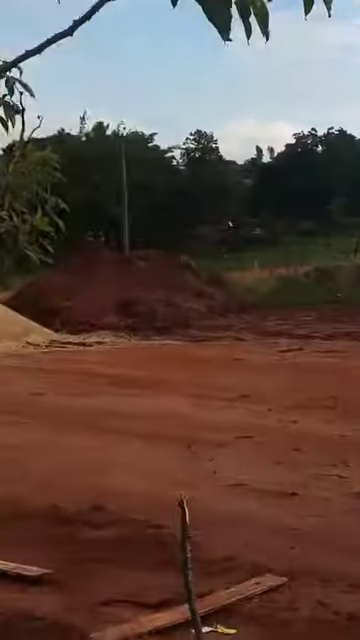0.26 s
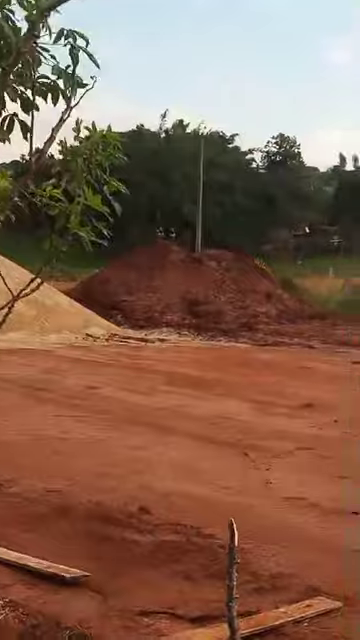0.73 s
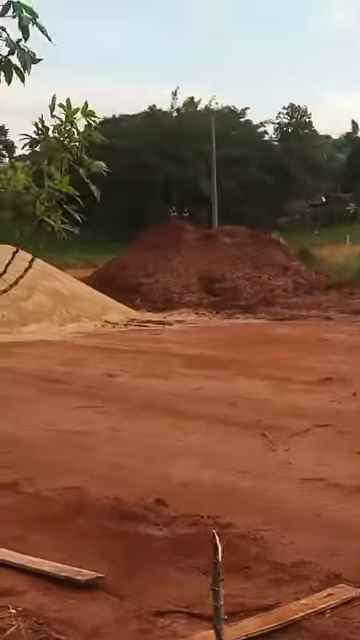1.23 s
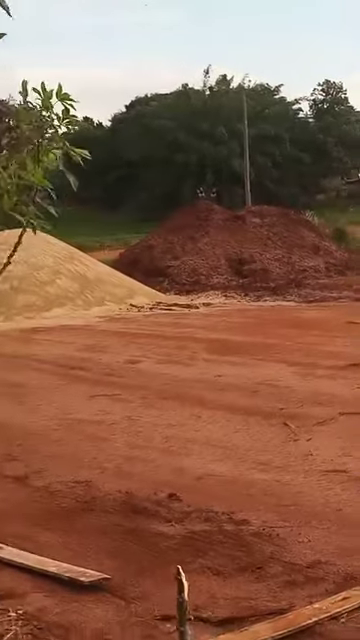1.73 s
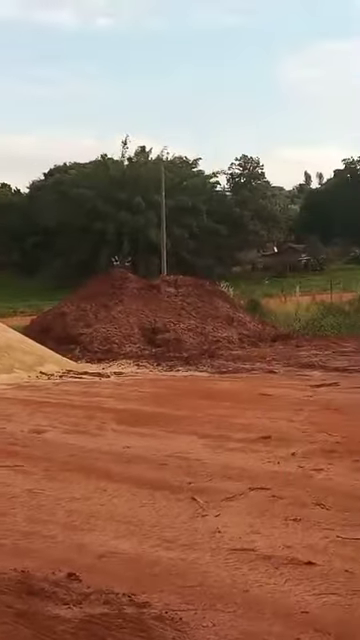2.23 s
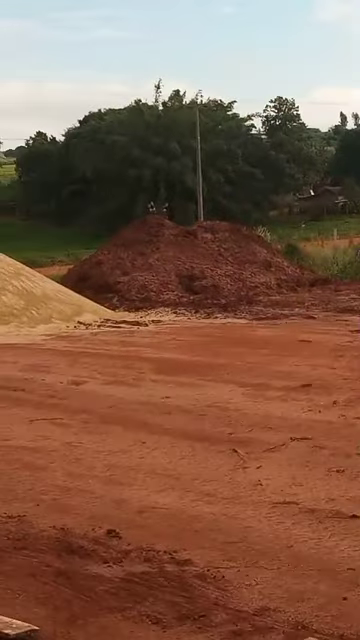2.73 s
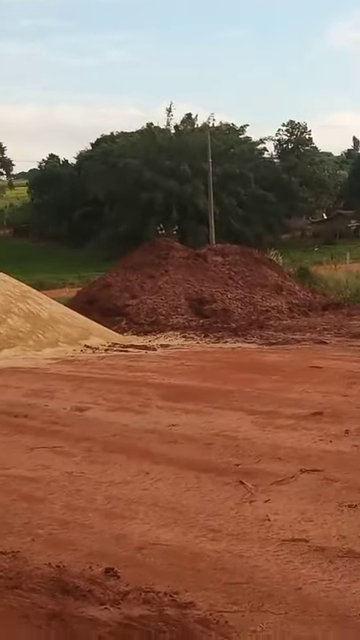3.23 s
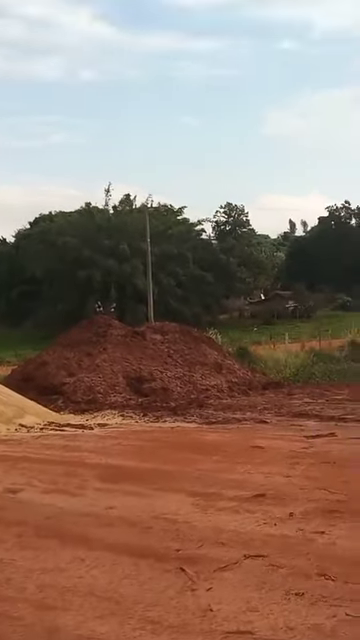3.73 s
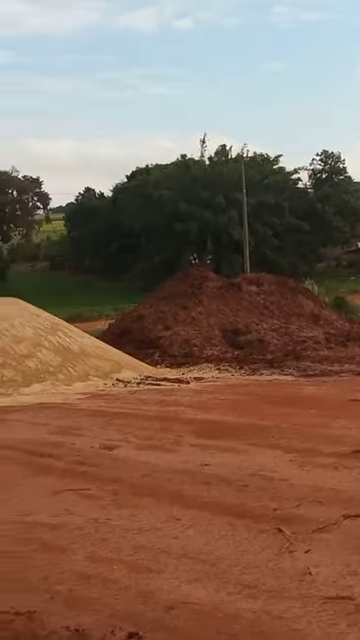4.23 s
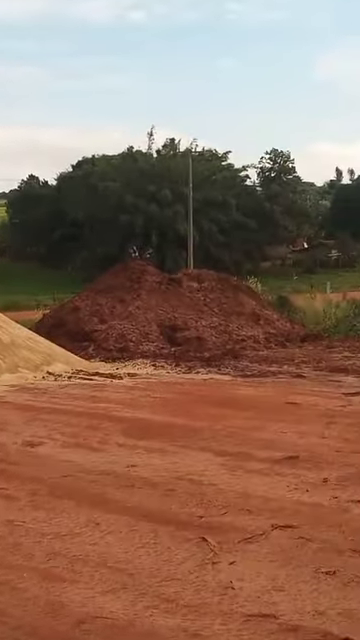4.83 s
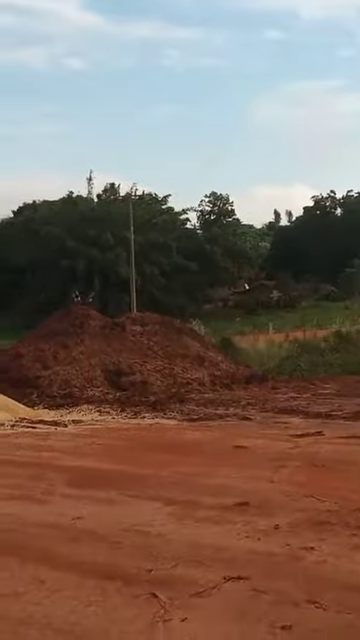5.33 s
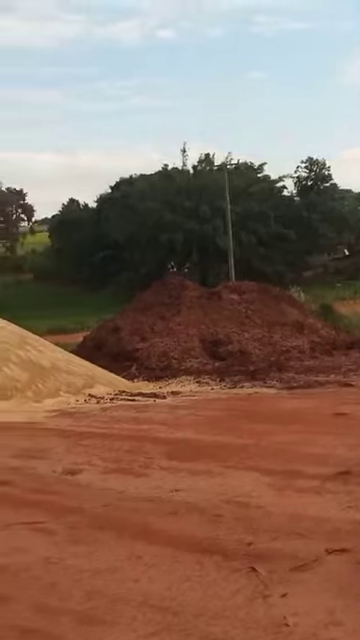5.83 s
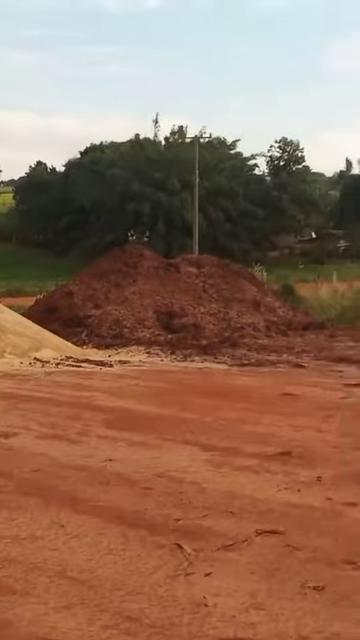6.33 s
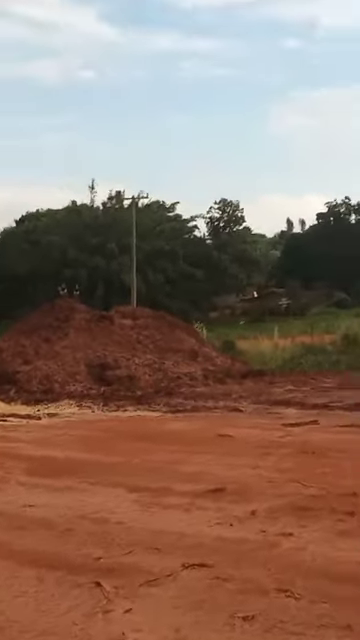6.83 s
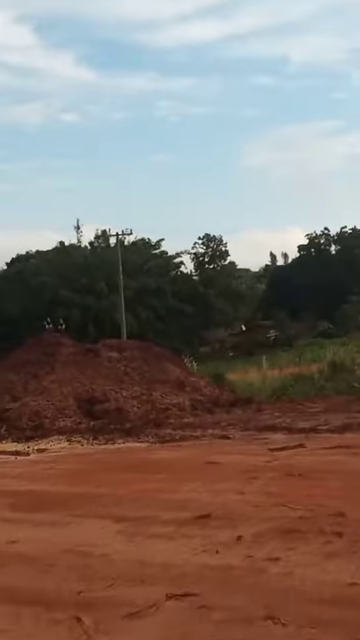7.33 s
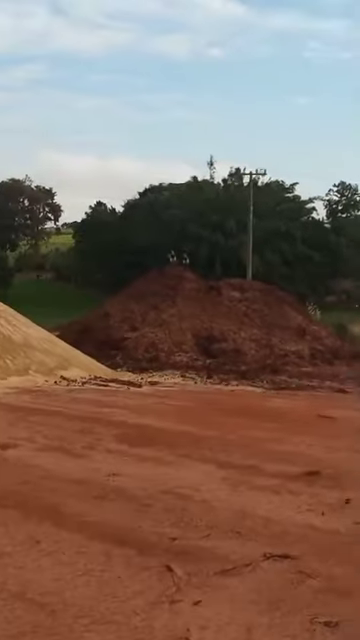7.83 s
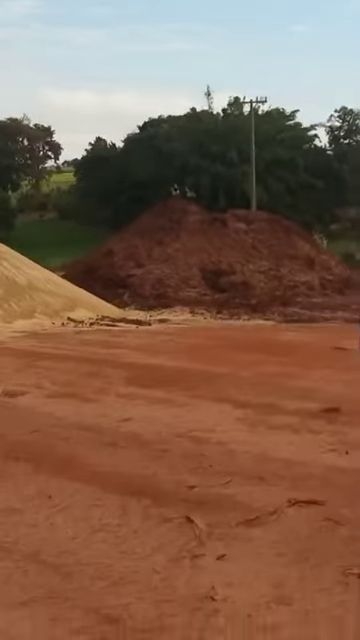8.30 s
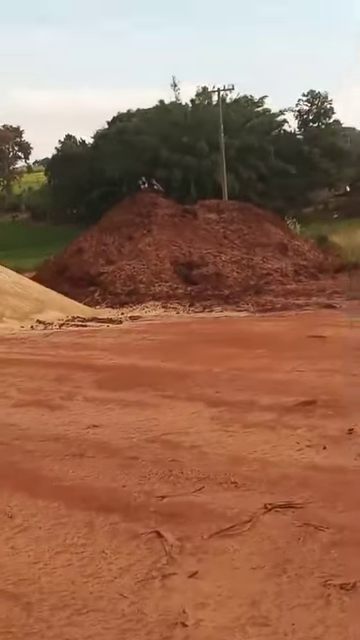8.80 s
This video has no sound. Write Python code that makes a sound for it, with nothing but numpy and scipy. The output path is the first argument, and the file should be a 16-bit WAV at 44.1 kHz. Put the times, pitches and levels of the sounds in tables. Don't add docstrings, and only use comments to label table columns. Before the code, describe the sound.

Harsh and mellower bird calls alternate about every half second, each a brief buzzy start sliding down, growing denser after six seconds. Clucks and small chirps fill gaps. Early light fingertip ticks and a fizzy rustle, later sharp rubs and a dull knock on the phone case. Soft low wind buffets strengthen toward the end; faint air hiss and a faraway engine lie beneath the open field.

```python
import sys
import numpy as np
from scipy import signal
from scipy.fft import rfft, irfft, next_fast_len
from scipy.io import wavfile
from scipy.ndimage import uniform_filter1d, map_coordinates

SR = 44100
rng = np.random.default_rng(int(sys.argv[2]) if len(sys.argv) > 2 else 0)


def generate_wav(sig):
    pcm = np.round(np.clip(np.atleast_2d(sig).T, -1, 1) * 32767).astype(np.int16)
    wavfile.write(sys.argv[1], SR, pcm)


def level_to_linear(level):
    exponent = np.asarray(level, float) / 20
    return 10 ** exponent


N = 399546

# [from t/s, to t/s, share of rasp/1]
HOARSE = [(.63, .74, .25), (2.68, 2.75, .35), (5.84, 5.86, .12), (6.55, 6.635, .6), (6.206, 6.24, .25),
          (5.683, 5.72, .25), (6.62, 6.72, .5), (7.15, 7.24, .45), (7.92, 8.003, .45), (8.54, 8.635, .7),
          (4.53, 4.655, .55), (2.99, 3.13, .3), (7.225, 7.43, .42), (7.8, 7.851, .4), (7.853, 7.93, .3),
          (8.29, 8.41, .5), (8.81, 8.9, .3)]
CROAKS_AFTER_S = .06


def unit(x):
    return x / np.sqrt(np.mean(x ** 2) + 1e-20)


def along(points, hz):
    f, v = np.transpose(points)
    return np.interp(np.log(hz + 1), np.log(f + 1), v)


def wobble(rate, size=N):
    knots = rng.standard_normal(int(size / SR * rate) + 4)
    return map_coordinates(knots, [np.arange(size) * rate / SR])


def rush(spectrum):
    m = next_fast_len(N)
    colour = level_to_linear(along(spectrum, np.fft.rfftfreq(m, 1 / SR)))
    return unit(irfft(rfft(rng.standard_normal(m)) * colour, m)[:N])


def place(out, s, sound):
    out[round(s * SR):][:len(sound)] += sound


def pings(events, cycles, noisy):
    out, t = np.zeros(N + SR), np.arange(SR // 10) / SR
    for s, db, hz in events:
        wave = np.sin(2 * np.pi * hz * t) + noisy * np.diff(rng.standard_normal(len(t) + 1))
        decay = np.exp(-t * hz / cycles) * (1 - np.exp(-t * hz / 0.5))
        place(out, s, level_to_linear(db + 9.5) * wave * decay)
    return out[:N]


def birds():
    # [t/s, length/s, top f/Hz, end f/Hz, level/dB]
    mellow_notes = [(.016, .144, 1189, 1022, -32.5), (.993, .117, 1135, 1010, -36),
                    (1.13, .13, 1204, 1025, -44), (1.497, .045, 1160, 1112, -34),
                    (1.535, .048, 1316, 1256, -36), (1.605, .145, 1140, 970, -42),
                    (2.14, .15, 1142, 998, -31), (3.248, .142, 1147, 950, -32),
                    (3.727, .148, 1206, 985, -30.5), (4.178, .132, 1189, 954, -28),
                    (4.23, .16, 1216, 994, -26), (4.775, .145, 1190, 1016, -28),
                    (5.755, .145, 1154, 984, -28), (6.29, .16, 1181, 1000, -28.5),
                    (6.775, .155, 1217, 1038, -30), (6.92, .07, 1030, 925, -34),
                    (8.735, .165, 1201, 935, -25.5)]
    # [rasp at the start/s, fade halfway/dB, beak/dB]
    mellow_voices = [(0, -13, -9), (.014, -6, -10), (0, .6, .6), (.015, -8, -9), (0, -2.5, 3),
                     (0, -3, -5.5), (.025, -7, -6.5), (.025, -8, -8.5), (0, -1.5, -3), (0, -12, -9.5),
                     (0, -6, -8), (0, -3, -2.5), (0, -8, .3), (0, -7, -5.5), (0, 4, -1.5), (0, -3, 1.5),
                     (0, -7, -8)]
    # [t/s, length/s, top f/Hz, end f/Hz, level/dB]
    harsh_notes = [(.65, .09, 1310, 1110, -31), (1.585, .025, 1256, 1214, -26),
                   (1.802, .098, 1232, 996, -42), (2.2, .085, 1287, 1199, -26),
                   (2.675, .125, 1200, 993, -31), (3.333, .075, 1283, 1172, -26),
                   (4.02, .09, 1264, 1184, -25), (4.652, .038, 1314, 1218, -27),
                   (4.7, .078, 1283, 1140, -26.5), (5.17, .09, 1278, 1129, -25),
                   (5.682, .09, 1292, 1150, -25), (5.85, .1, 1280, 1172, -27),
                   (6.205, .09, 1283, 1140, -26), (6.6, .03, 1157, 1160, -28),
                   (6.688, .082, 1259, 1104, -27), (7.22, .012, 1100, 1120, -29),
                   (7.24, .18, 1295, 1030, -26.5), (7.745, .105, 1258, 1120, -25.5),
                   (7.852, .07, 1280, 1140, -27), (8.0, .075, 1274, 1140, -33),
                   (8.232, .098, 1243, 1123, -26), (8.37, .08, 1249, 1012, -26),
                   (8.63, .08, 1265, 1200, -30), (8.87, .05, 1285, 1128, -26.5)]
    # [length/s, start f/Hz, start level/dB, beak/dB, share of the fall done halfway/1]
    run_ups = [(.025, 1204, -45, 2.5, .3), (.004, 1256, -28, 3, .5), (.05, 1247, -50, -2, .3),
               (.077, 1274, -43, 3, .14), (.06, 1165, -35.5, -2.5, .38), (.022, 1284, -38, 4, .24),
               (.084, 1248, -38, -1, .19), (.125, 1281, -30, 3, .5), (.08, 1199, -35, -6, .62),
               (.065, 1100, -41, 1.5, .37), (.067, 1182, -36, 2, .62), (.024, 1160, -29, .3, .5),
               (.074, 1150, -41, .6, .61), (.043, 1156, -34, 3, .5), (.058, 1293, -30, 1.5, .64),
               (.068, 1060, -27, -1, .5), (.014, 1270, -34, -.6, .42), (.04, 1200, -32, -7, .55),
               (.055, 1215, -34, -1.5, .5), (.08, 1175, -27, 3, .12), (.033, 1200, -33, -2.5, .5),
               (.07, 1200, -35, 2, .55), (.088, 1234, -32.5, 3, .28), (.07, 1209, -31, -4, .4)]
    # [at the top/dB, halfway/dB, at the end/dB]
    swells = [(-2.5, 0.0, -15.0), (-2.5, -1.0, -8.0), (6.0, -2.0, -6.5), (-1.0, 2.0, -12.0),
              (-4.5, 0.0, -9.0), (-1.5, -1.5, -4.0), (-3.5, 0.5, -10.5), (-3.5, 0.5, -3.5),
              (0.0, 1.0, -2.0), (-1.0, -2.5, -11.0), (-2.5, -0.5, -2.0), (-1.0, 1.0, -3.0),
              (0.0, -2.5, -6.0), (-4.5, -1.5, -7.5), (1.5, -4.0, -7.0), (-7.5, -8.0, -13.5),
              (-2.5, -3.5, -6.0), (0.0, -1.5, -4.5), (-1.5, 1.0, -4.0), (-4.0, -3.0, -14.0),
              (0.0, -0.5, -2.5), (0.5, -2.5, -8.0), (-4.0, -4.5, -4.0), (-2.5, 0.5, -7.0)]
    # [t/s, length/s, top f/Hz, level/dB, beak/dB]
    chirps = [(2.375, .045, 876, -47, -24), (2.99, .05, 1040, -36, -3), (3.062, .06, 965, -43, -8),
              (3.315, .055, 1070, -35, 0), (3.572, .065, 830, -43, -5.5), (5.505, .055, 767, -46, -28),
              (7.235, .115, 1160, -34, 0), (7.83, .1, 1210, -34, 1.5), (7.66, .06, 984, -41.5, -6.5),
              (8.04, .03, 927, -36, -6), (8.07, .045, 958, -38, -6), (8.62, .05, 1095, -31, 1.5),
              (8.9, .06, 1137, -30, 4)]
    # [overtone 2/dB, 3/dB, 4/dB, 5/dB, 8 and up/dB]
    mellow_tints = [(3.0, 2.0, 3.0, 1.0, 8.0), (0.0, -1.0, 2.0, 9.0, 1.0), (-2.0, -3.0, -3.0, 0.0, 10.0),
                    (-7.0, 0.0, -1.0, 6.0, 10.0), (-5.0, 0.0, 3.0, -6.0, 10.0),
                    (1.0, 6.0, 4.0, 0.0, 10.0), (2.0, 1.0, 3.0, 1.0, -4.0), (-2.0, -3.0, -1.0, 3.0, -2.0),
                    (4.0, 2.0, 2.0, -5.0, -5.0), (2.0, 1.0, 6.0, -1.0, -4.0),
                    (0.0, 1.0, 3.0, -10.0, -8.0), (-2.0, -2.0, 3.0, -2.0, 3.0),
                    (-4.0, 2.0, 6.0, -3.0, -3.0), (-2.0, 5.0, 0.0, 0.0, -3.0),
                    (-1.0, -2.0, 4.0, 1.0, 0.0), (3.0, -7.0, 5.0, -8.0, -4.0),
                    (-1.0, 4.0, 4.0, 5.0, -5.0)]
    harsh_tints = [(-1.0, 1.0, 1.0, -5.0, 5.0), (2.0, -2.0, 0.0, 9.0, -1.0), (0.0, -7.0, 6.0, -1.0, -4.0),
                   (-4.0, -10.0, 4.0, -1.0, 8.0), (0.0, 3.0, -2.0, 0.0, -10.0),
                   (3.0, -4.0, 2.0, -4.0, 1.0), (-1.0, -6.0, 5.0, 0.0, 3.0),
                   (-1.0, -5.0, 3.0, -8.0, -4.0), (0.0, 0.0, 3.0, -2.0, -10.0),
                   (4.0, -2.0, 4.0, -4.0, 1.0), (1.0, -1.0, -1.0, -3.0, -1.0),
                   (2.0, -5.0, -1.0, 0.0, -4.0), (4.0, -3.0, 1.0, -5.0, 7.0),
                   (-6.0, 1.0, -2.0, 4.0, -2.0), (1.0, 0.0, 2.0, 2.0, 2.0), (0.0, 3.0, -4.0, -6.0, -2.0),
                   (-1.0, 3.0, 1.0, 4.0, 1.0), (1.0, -1.0, -1.0, 5.0, 3.0), (3.0, 3.0, -5.0, -4.0, -3.0),
                   (-3.0, 4.0, 1.0, -2.0, 8.0), (3.0, -5.0, -2.0, 5.0, -2.0),
                   (3.0, -1.0, -2.0, 4.0, -5.0), (-4.0, 5.0, -4.0, 4.0, 2.0),
                   (0.0, -4.0, 4.0, -2.0, -10.0)]
    chirp_tint = (2, 2, -5, -7, -9)

    songs = [mellow(*pair) for pair in zip(mellow_notes, mellow_voices)]
    songs += [harsh(*parts) for parts in zip(harsh_notes, run_ups, swells)]
    songs += [chirp(*row) for row in chirps]
    tints = [*mellow_tints, *harsh_tints] + [chirp_tint] * len(chirps)
    out = np.zeros(N + SR)
    for n, ((rows, *voice), tint) in enumerate(zip(songs, tints)):
        place(out, rows[0][0], call(rows, *voice, tint, soft=n < len(mellow_notes)))
    return out[:N] + clucks() + pips()


def harsh(note, run_up, swell):
    s, length, top, end, db = note
    lead, from_hz, from_db, beak_db, bend = run_up
    rows = [(s - lead, from_hz, from_db),
            (s, top, db + swell[0]),
            (s + length / 2, top - bend * (top - end), db + swell[1]),
            (s + length, end, db + swell[2])]
    strained = any(start < s < stop for start, stop, _ in HOARSE)
    croak_db = -19 - 60 * (lead + length < CROAKS_AFTER_S)
    return rows, s - strained * (lead - .012), beak_db, croak_db


def mellow(note, voice):
    s, length, top, end, db = note
    rasp, half_db, beak_db = voice
    fade_db_per_s = 130
    peak = s + min(.03, length / 4)
    half = (peak + s + length) / 2
    rows = [(s, .925 * top, db - 5),
            (peak, top, db),
            (half, top - .5 * (top - end), db + half_db),
            (s + length, end, db + half_db - fade_db_per_s * (half - peak))]
    return rows, s + rasp, beak_db, -23 - 60 * (length < CROAKS_AFTER_S)


def chirp(s, length, top, db, beak_db):
    rows = [(s, .88 * top, db - 5), (s + .43 * length, top, db), (s + length, .83 * top, db - 6)]
    return rows, s, beak_db, -27


def call(rows, rasp_end, bright_db, croak_db, tint, soft):
    # [from t/s, to t/s]
    catches = [(2.623, 2.633), (5.113, 5.124), (5.625, 5.637), (5.645, 5.675), (7.16, 7.167),
               (7.713, 7.722)]
    s, hz, db = np.transpose(rows)
    age = np.arange(int((s[-1] - s[0] + .09) * SR)) / SR
    t = s[0] + age
    after = t - s[-1]

    rasp = np.clip((rasp_end - t) / .006, .03, 1)
    for start, end, share in HOARSE:
        inside = np.minimum(t - start, end - t)
        rasp = np.maximum(rasp, share * np.clip(inside / .008 + .5, 0, 1))

    slap_hz = 100 * level_to_linear(5 * np.clip(wobble(70, size=len(t)), -2, 2))
    beat = 2 * np.pi * np.cumsum(slap_hz) / SR
    jitter = wobble(500, size=len(t))
    jitter = jitter - uniform_filter1d(jitter, size=500)
    swing = .013 * np.sin(beat + 2.2) + .034 * jitter
    glide = uniform_filter1d(np.interp(t, s, hz), size=700, mode="nearest")
    pitch = glide * (1 + rasp * swing + 0.0018 * wobble(60, size=len(t)))

    level = level_to_linear(np.interp(t, s, db)) * (1 + .55 * np.sqrt(rasp) * np.sin(beat + 1))
    level = level * level_to_linear(1.3 * rasp * wobble(250, size=len(t)))
    for start, end in catches:
        level = level * np.clip(np.maximum(start - t, t - end) / .002 + 1, .08, 1)
    level = level * np.clip(age / .005, 0, 1) * np.clip(-after / .006 + .5, 0, 1)

    halves = .55 * (rasp - .03) * np.clip(wobble(60, size=len(t)) + .3, 0, 1)
    beak_db = bright_db - rasp * (5 + 10 * np.exp(-age / .03)) - soft * 9 * np.exp(-age / .03)
    wane_db = -soft * np.clip(190 * (age - .06), 0, 9)
    voice = syrinx(pitch, beak_db, turning_db=5, halves=halves, tint=tint, wane_db=wane_db)

    tail = after[after > 0]
    drop = level_to_linear(db.max() + croak_db) * croak(tail, 830, 0.068)
    return level * voice + np.pad(drop, (len(t) - len(tail), 0))


def syrinx(pitch, bright_db, turning_db, halves=0, tint=(0, 0, 0, 0, 0), wane_db=0):
    # [f/Hz, level/dB]
    throat = [(700, -38), (1200, -26), (1600, -13), (2350, -3), (2900, 0), (3500, -7), (4900, -3.5),
              (5600, -14.5), (6300, -6.5), (7300, -25), (8200, -45), (9800, -26), (12300, -52),
              (15000, -39)]
    k = np.r_[1:18, 2.5:7][:, None]

    def slow(x):
        return np.broadcast_to(x, pitch.shape)[::8]

    hz, bright_db = k * slow(pitch), slow(bright_db)
    treble = np.clip((9500 - hz) / 2000, .25 + .75 * (bright_db < -22), 1)
    upper = np.clip((k - 2) * .75, 0, 1) * treble
    turn = np.array([wobble(35 * 8, size=hz.shape[1]) for _ in k]) * np.clip((k - 1.5) / 2, .25, 1)
    gain = level_to_linear(along(throat, hz) + bright_db * upper + turning_db * turn)
    gain = gain * np.where(k % 1 > 0, slow(halves), 1)
    gain = gain / np.sqrt(np.sum(gain ** 2, axis=0) / 2)
    gain = np.repeat(gain, 8, axis=1)[:, :len(pitch)]
    tint_db = np.interp(k, [1, 2, 3, 4, 5, 6, 8], [0, *tint[:4], 0, tint[4]])
    gain = gain * level_to_linear(.85 * tint_db)
    gain = gain * np.where(k == 2, level_to_linear(wane_db), 1)
    phase = 2 * np.pi * np.cumsum(pitch) / SR
    return np.sum(gain * np.sin(k * phase + k * k * 0.6), axis=0)


def croak(t, hz, length):
    early = np.clip(t, 0, .08)
    sag = hz * (1 - 70 * early ** 2 - early) * (1 + 0.014 * wobble(197.5, size=len(t)))
    envelope = np.clip(t / .008, 0, 1) * np.clip((length - t) / .02, 0, 1)
    return envelope * syrinx(sag, -6 - 150 * t, turning_db=5)


def clucks():
    # [t/s, peak level/dB, second overtone f/Hz]
    cluck_notes = [(0.638, -36.5, 1725), (1.125, -54, 1820), (1.6, -50, 1740), (1.6427, -43.5, 1600),
                   (1.7744, -43.5, 1517), (2.1565, -53, 1770), (2.6898, -41.5, 1827), (.99, -42, 2850),
                   (2.703, -29, 2390), (4.232, -29, 2460), (7.722, -28, 2500), (3.3119, -39, 1960),
                   (5.743, -45, 1990), (6.9192, -36, 1980), (7.2479, -47, 2040), (7.7775, -37.5, 1925),
                   (8.283, -40, 2095)]
    out, t = np.zeros(N + SR), np.arange(SR // 16) / SR
    for s, db, hz in cluck_notes:
        place(out, s, level_to_linear(db) * croak(t, hz / 2, 0.032))
    return out[:N]


def pips():
    # [t/s, peak level/dB, f/Hz]
    pulses = [(1.496, -30, 2450), (1.645, -33, 2280), (1.654, -33, 3350), (2.126, -36, 2250),
              (2.704, -23, 2390), (3.262, -28, 2500), (4.233, -25, 2420), (6.134, -34, 2150),
              (6.147, -29, 3200), (6.166, -27, 3350), (6.765, -27, 2300), (7.149, -27, 2080),
              (8.367, -24, 2500), (8.688, -24, 3650), (8.696, -24, 3600)]
    out, t = np.zeros(N + SR), np.arange(SR // 16) / SR
    hump = np.sin(np.pi * np.clip(t / .009, 0, 1)) ** 2
    for s, db, hz in pulses:
        place(out, s, level_to_linear(db) * hump * np.sin(2 * np.pi * hz * t))
    return out[:N]


def field(x, delay, near_db):
    # [f/Hz, decay by 60 dB/s]
    tree_line = [(1000, 0.3), (2400, 0.25), (4500, 0.34), (7000, 0.36), (12000, 0.25)]
    hz, t, z = signal.stft(rng.standard_normal(SR), SR, nperseg=256)
    rise = np.where(t < delay, level_to_linear(near_db), 1)
    trees = level_to_linear(-60 * t / along(tree_line, hz)[:, None])
    slopes = level_to_linear(-25 - 60 * t / 1.0)
    tail = signal.istft(z * rise * (trees + slopes), SR, nperseg=256)[1]
    return signal.fftconvolve(x, tail / np.linalg.norm(tail))[:N]


def wind():
    # [f/Hz, level/dB per Hz]
    buffet = [(25, -50), (45, -17), (65, -3), (110, 0.5), (145, -5.5), (200, -17.5), (320, -31.5),
              (500, -52.5)]
    # [peak t/s, peak level/dB, time to rise 20 dB/s, time to sink 20 dB/s]
    gusts = [(.07, -60, .15, .12), (.39, -57.5, .09, .6), (.72, -55.5, .13, .18), (2.18, -61, .2, .15),
             (2.54, -71, .6, .33), (2.84, -59, .1, .2), (3.13, -62, .13, .1), (3.49, -52.5, .2, .6),
             (3.3, -60, .08, .08), (3.89, -47.5, .6, .67), (4.47, -44, .23, .07), (4.61, -54, .14, .17),
             (5.48, -69, .3, .15), (6.09, -55, .25, .13), (6.67, -51, .11, .39), (7.42, -49, .145, .11),
             (7.99, -40, .38, .3), (8.13, -44.5, .3, .17), (8.47, -51.5, .05, .065), (8.76, -42, .08, .5)]
    # [t/s, peak level/dB, f/Hz]
    thumps = [
        (3.879, -36, 119),
        (4.456, -40.5, 138),
        (7.96, -40, 135),
        (8.119, -39, 96.9),
        (8.443, -44.5, 93),
        (8.748, -41, 116),
        (8.928, -56, 72.7),
    ]
    lumps = unit(level_to_linear(4.5 * wobble(18)) * rush(buffet))
    t, strength_db = np.arange(N) / SR, np.full(N, -79.0)
    for s, db, rise, sink in gusts:
        gust_db = db - 20 * np.maximum((s - t) / rise, (t - s) / sink)
        strength_db = np.maximum(strength_db, gust_db)
    return level_to_linear(strength_db - 2) * lumps + pings(thumps, cycles=0.97, noisy=0)


def hand():
    # [t/s, length/s, fizz level/dB, scuff level/dB]
    rustle = [
        (0.486, 0.3, -51, -61),
        (1.954, 0.19, -54, -75),
        (2.039, 0.069, -68, -61.5),
        (6.35, 0.25, -84, -66),
        (6.623, 0.062, -45, -47.5),
        (6.758, 0.13, -49, -52),
        (6.955, 0.2, -85.5, -70),
        (7.18, 0.065, -85, -65),
        (7.29, 0.054, -80, -59),
        (7.367, 0.044, -45, -47),
    ]
    # [f/Hz, level/dB per Hz]
    fizz_colour = [(530, -52), (900, -27), (1830, -12), (2460, -17), (3890, -17), (5310, -18), (6430, -3),
                   (7790, -21), (15800, -33)]
    scuff_colour = [(120, -16), (250, -9.5), (600, -4), (1000, -18), (2000, -25)]
    # [t/s, peak level/dB, f/Hz]
    ticks = [(0.5616, -38, 6360), (0.5916, -54, 7060), (0.5916, -45, 6500), (0.613, -42, 6300),
             (0.658, -42, 6440), (0.6968, -36, 6460), (0.7856, -41, 6500), (0.9338, -58, 6600),
             (1.0554, -56, 6180), (2.0278, -31, 6700), (2.0434, -30, 6140), (2.0604, -39, 6050),
             (5.5264, -44, 6360)]
    # [t/s, peak level/dB, f/Hz]
    knocks = [
        (0.57, -52.5, 590),
        (1.05, -53, 348),
        (1.076, -49.5, 366),
        (1.192, -66, 377),
        (3.553, -51, 487),
        (5.868, -66, 473),
        (7.377, -38.5, 440),
    ]
    t = np.arange(N) / SR
    strokes = [np.sin(np.pi * np.clip((t - s) / length, 0, 1) ** .8) for s, length, *_ in rustle]
    fizz_gain, scuff_gain = level_to_linear(np.array(rustle)[:, 2:]).T @ np.abs(strokes)
    fizz = fizz_gain * unit(level_to_linear(2.5 * wobble(200)) * rush(fizz_colour))
    scuff = scuff_gain * unit(level_to_linear(2.6 * wobble(60)) * rush(scuff_colour))
    return fizz + scuff + pings(ticks, cycles=7, noisy=.25) + pings(knocks, cycles=1.8, noisy=0)


def motor():
    # [t/s, firing f/Hz]
    revs = [(0, 105), (.65, 125), (1.1, 119), (1.5, 106), (1.8, 120), (2.2, 130), (2.45, 103), (2.75, 116),
            (3.3, 124), (3.5, 114), (4.4, 127), (4.85, 112), (5.1, 122), (6.3, 122), (7, 116), (7.2, 125),
            (7.5, 115), (9.06, 122)]
    # [multiple of the firing rate/1, level/dB]
    exhaust = [(1, 3), (8, 0), (9, -1), (10, -5), (11, -7)]
    s, firing_hz = np.transpose(revs)
    hz = np.interp(np.arange(N) / SR, s, firing_hz)
    idle_hz, idle_db, db_per_hz = 104, -92, .33
    db = idle_db + db_per_hz * (hz - idle_hz)
    turn = 2 * np.pi * np.cumsum(hz * (1 + 0.0031 * wobble(11))) / SR
    tones = sum(level_to_linear(level + 4 * wobble(5)) * np.sin(k * turn) for k, level in exhaust)
    return level_to_linear(db - 1) * tones


def country_hiss(flock):
    # [f/Hz, level/dB per Hz]
    hiss_colour = [(40, -27), (100, -14), (314, -16), (600, -19), (800, -22), (1120, -19), (1900, -21),
                   (2800, -16), (4500, -14), (6400, -5), (7400, -16), (8200, -34), (9700, -28),
                   (12000, -43), (15800, -35)]
    hiss = level_to_linear(-65.5 + 1.8 * wobble(3.62)) * rush(hiss_colour)
    loud = np.sqrt(np.abs(uniform_filter1d(flock ** 2, size=round(.03 * SR))))
    duck = 1 / (1 + loud / level_to_linear(-36))
    high = irfft(rfft(hiss) * (np.fft.rfftfreq(N, 1 / SR) > 1200), N)
    return hiss - (1 - duck) * high


def scene():
    flock = birds()
    echo = field(flock, delay=.088, near_db=-19)
    return (flock + level_to_linear(-12.5) * echo + wind() + hand() + motor() + country_hiss(flock))[None]


def top_cut(x):
    return signal.sosfilt(signal.butter(12, 16470, fs=SR, output="sos"), x)


def record(dry):
    heard = irfft(rfft(dry) * (np.fft.rfftfreq(N, 1 / SR) < 15830), N)
    return top_cut(heard)


dry = scene()
out = record(dry)
generate_wav(out)
```